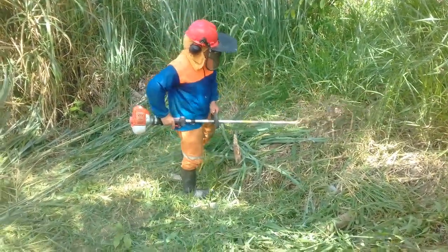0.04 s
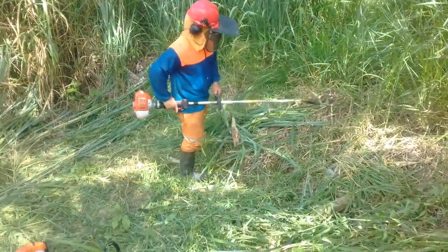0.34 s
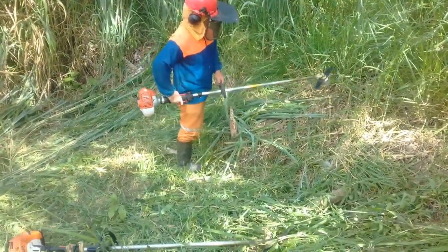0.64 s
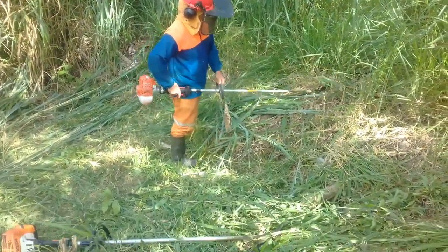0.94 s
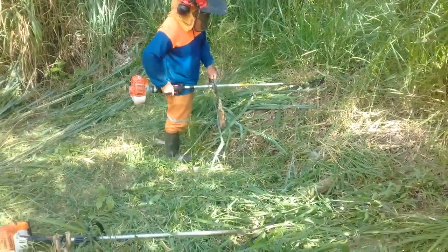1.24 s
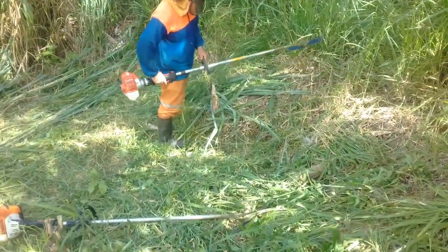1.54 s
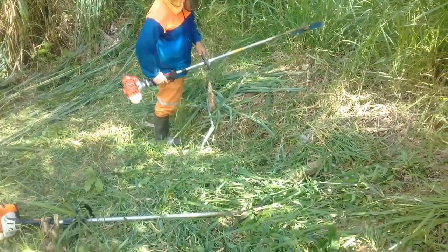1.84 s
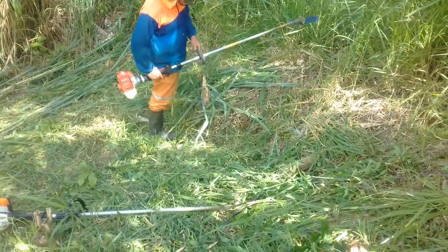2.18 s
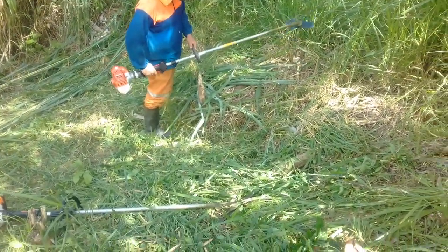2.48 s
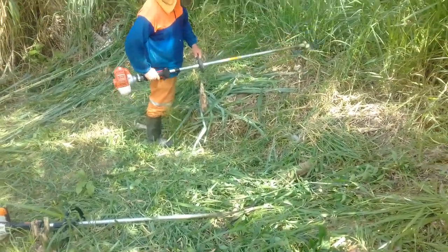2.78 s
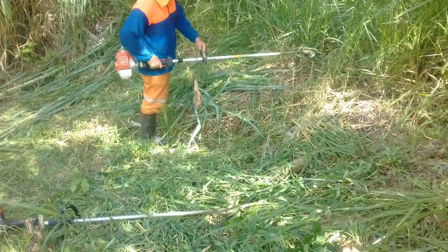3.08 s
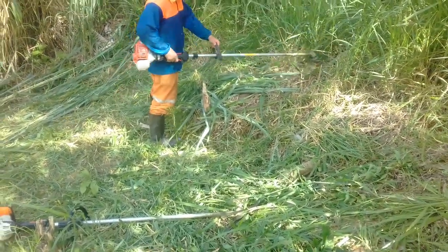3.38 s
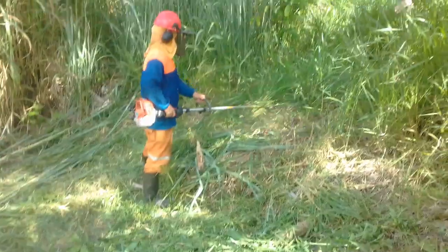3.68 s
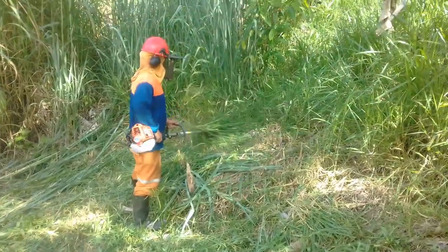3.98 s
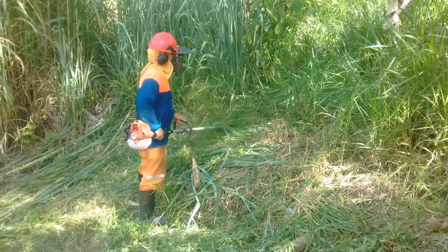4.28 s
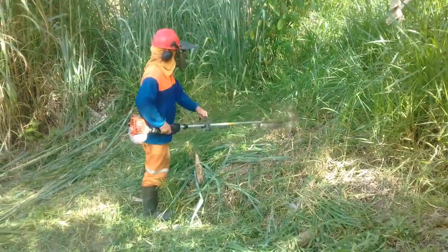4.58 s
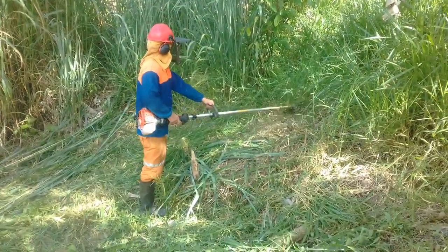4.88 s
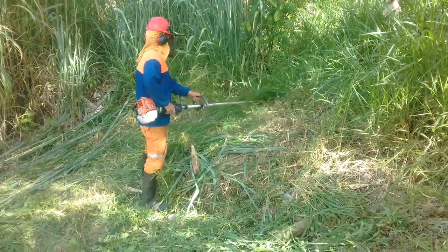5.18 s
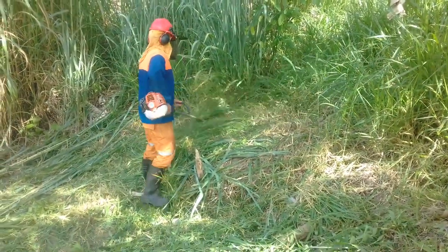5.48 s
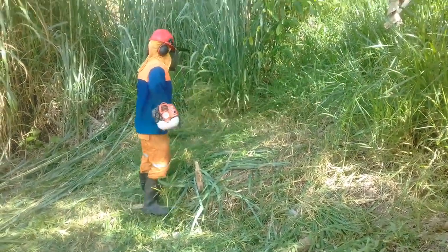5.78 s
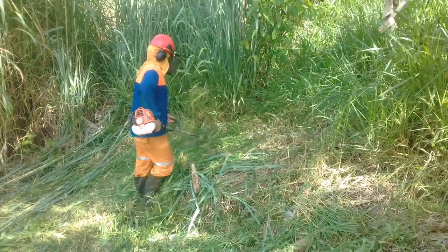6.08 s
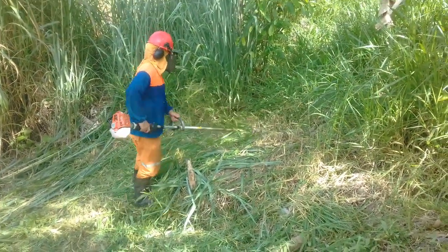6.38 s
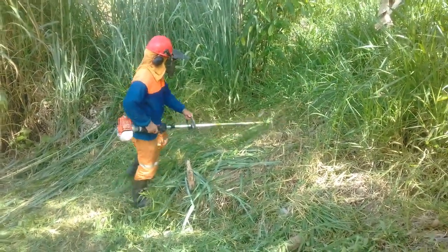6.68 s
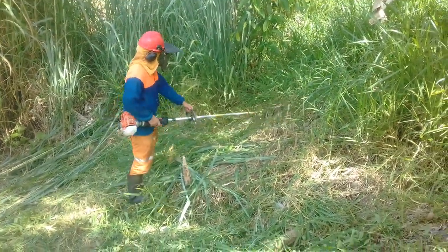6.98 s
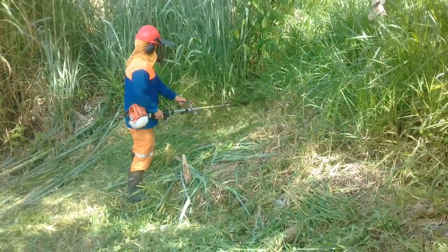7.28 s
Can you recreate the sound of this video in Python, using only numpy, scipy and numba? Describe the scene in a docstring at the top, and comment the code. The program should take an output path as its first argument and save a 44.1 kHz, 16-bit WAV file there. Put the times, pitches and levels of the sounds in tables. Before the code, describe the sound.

A two-stroke brushcutter a few metres away runs down to a lumpy idle with uneven pops and metallic clacks. After about two seconds it revs up with a brief scrape into a rattling buzz. The pitch rises and sags as the blade sweeps through tall grass, each cut making a bright, shredding crackle, with occasional stalk snaps and faint metal rings. It is heard in mono, over a faint outdoor hush.

```python
"""A brushcutter in tall grass

A two-stroke engine a few metres away, heard in mono, runs down to a lumpy, clacking idle, is revved,
then labours through sweep after sweep. One crankshaft times the exhaust pulses and the metal clatter.
Each pull of the trigger lifts and cleans the note, which changes colour as the machine swings.
Each cut shreds stalks into a bright crackle."""
import sys
import numpy as np
from scipy import signal
from scipy.fft import rfft, irfft
from scipy.io import wavfile
from scipy.ndimage import uniform_filter1d, map_coordinates
from numba import njit

SR = 44100
rng = np.random.default_rng(int(sys.argv[2]) if len(sys.argv) > 2 else 0)


def output_pcm(signal):
    """Save a mono or channel-first signal as 16-bit PCM at the path in sys.argv[1].

    Samples are clipped to [-1, 1] before scaling.
    """
    pcm = np.clip(np.atleast_2d(signal).T, -1, 1) * 32767
    wavfile.write(sys.argv[1], SR, np.round(pcm).astype(np.int16))


N = 332514
TIME = np.arange(N) / SR

# Engine speed. Each row: time in seconds, crankshaft turns per second.
IDLE_SPEED = [(0, 60.3), (.3, 52.4), (.62, 46.1), (1.55, 45.95), (1.78, 44.8), (2.0, 44.35), (2.34, 42.2)]
WORK_SPEED = [(2.42, 65.34), (2.48, 80.9), (2.5, 87.9), (2.6, 94.1), (2.69, 95.14), (3.3, 95.16),
              (3.62, 106.9), (3.76, 109.1), (3.96, 119.3), (4.27, 132.6), (4.59, 127.3), (4.81, 110),
              (4.9, 108.5), (5.27, 116.5), (5.53, 116), (5.77, 122.3), (5.89, 128.2), (6.27, 131.4),
              (6.53, 118.7), (6.77, 116.8), (7.08, 119.6), (7.43, 131.1), (7.54, 128.3)]
# Strength of the idle. Each row: time in seconds, relative level in dB.
IDLE_LEVEL = [(0, 5.5), (.55, -1), (.9, -1), (1.15, 2.5), (1.45, 7), (2.34, 6.5)]
# The idle's limp. Each row: start in seconds, turns per firing (a fraction mixes twos and threes).
IDLE_RHYTHM = [(.497, 2.5), (.754, 3), (.884, 2), (.971, 3), (1.361, 2.34), (1.667, 2), (2.208, 3),
               (2.28, 2)]
# The worker's swing. Each row: time in seconds, facing (0 is side on, 1 is engine towards us).
FACING = [(2.4, 0.0075), (3.4, 0.15), (3.85, 0.47), (4.02, 0.58), (4.22, 0.56), (4.32, 0.38), (4.55, 0.42),
          (4.8, 0.13), (5.1, 0.29), (5.35, 0.48), (5.6, 0.861), (6.2, 0.98), (6.7, 0.024), (7.15, 0.036),
          (7.54, 0.49)]
# The bounce off the ground. Each row: time in seconds, delay in milliseconds, share sent back.
GROUND_BOUNCE = [(2.4, .765, .17), (2.82, .8, .14), (2.92, .93, .12), (3.4, .96, .07), (4.8, 1.08, .07),
                 (5.15, 1.3, .08), (5.55, 1.25, .14), (5.85, 1.16, .12), (6.15, 1.18, .15),
                 (6.45, 1.27, .17), (6.7, 1.315, .17), (7.54, 1.33, .12)]
# Pulls of the trigger. Each row: start, end and rise time in seconds, then base levels in dB
# for the engine's five voices: boom, lower pipe, upper pipe, muffler bark and clatter.
TRIGGER_PULLS = [(2.339, 3.344, 0.097, -42.5, -29.5, -29, -29, -19.5),
                 (3.322, 4.242, 0.073, -46.5, -32, -47, -35.5, -30),
                 (4.79, 5.894, 0.09, -42.5, -39, -46, -39, -24),
                 (6.051, 6.168, 0.24, -31.5, -30.5, -41.5, -25, -13),
                 (6.562, 7.411, 0.13, -41, -39.5, -39.5, -42, -25)]
# Those five voices in order. Each row: level with the trigger eased in dB,
# growth with speed in dB per Hz, change when the engine faces us in dB.
VOICE_RESPONSE = [(-51, 0.5, 1), (-49, 0.36, 1), (-52.5, 0.37, 3), (-40, 0.28, -7), (-24.5, 0.3248, -3.5)]
# Runs of thumping misfires. Each row: start and end in seconds, level in dB.
STUMBLES = [(4.6, 4.821, -50), (5.944, 6.079, -44), (6.17, 6.577, -41.5), (7.418, 7.539, -47)]
# Single harmonics (multiples of the engine speed) swell or sink as the machine swings.
# Each row: start and end in seconds, harmonic number, change in dB.
HARMONIC_SWELLS = [(-.1, .5, 4, 6), (2.47, 2.97, 12, 11), (2.55, 2.95, 14, 0), (2.595, 3.272, 18, 4.5),
                   (2.694, 3.278, 19, 17.5), (3.08, 3.4, 17, -12), (3.021, 3.351, 10, -10),
                   (3.038, 3.36, 9, -2.5), (3.787, 4.04, 7, 7.5), (3.501, 3.848, 13, -4),
                   (3.52, 4.24, 10, -3), (3.547, 4.13, 14, 5.5), (3.965, 4.553, 11, 4),
                   (4.07, 4.547, 4, 11.5), (4.347, 4.53, 10, 6), (4.864, 5.243, 6, 5), (4.97, 5.318, 7, -6),
                   (5.03, 5.35, 8, -9), (5.081, 5.453, 10, -5), (5.162, 5.641, 11, 5.5),
                   (5.26, 5.571, 12, -8), (5.563, 5.84, 8, -2), (5.15, 5.42, 3, -12), (5.599, 5.799, 10, 6),
                   (5.66, 5.92, 11, 0.5), (6.122, 6.479, 11, 6), (6.459, 6.726, 14, 6), (6.44, 6.7, 12, -3),
                   (6.371, 6.578, 7, 12), (3.4, 4.55, 1, -5), (6.38, 6.907, 3, -5), (6.492, 7.219, 9, 14.5),
                   (6.561, 6.86, 10, 10), (6.649, 6.936, 5, -6), (6.791, 7.445, 6, 7),
                   (7.027, 7.34, 13, -15), (7.28, 7.467, 12, 1.5), (7.16, 7.45, 8, -5),
                   (7.242, 7.45, 7, -8.5)]
# Bright bands in the clatter for a while as the engine revs. Each row: start and end in seconds, pitch in Hz,
# lift in dB.
BRIGHT_BANDS = [(2.453, 2.902, 8400, 3), (2.522, 3.08, 7100, 4.5), (2.56, 2.92, 11700, 8.5),
                (2.884, 3.142, 9080, 6.5)]
# Bites into the grass. Each row: start, end and rise time in seconds, level in dB, extra dB for stalks.
CUTS = [(-.01, 0.089, 0.0089, -23, 2.5), (0.153, 0.259, 0.054, -28, 5), (0.276, 0.39, 0.024, -32.5, 3),
        (0.93, 0.999, 0.046, -27, 2.5), (1.38, 1.392, 0.017, -31.5, 5), (3.27, 3.442, 0.14, -13, -1),
        (3.464, 3.722, 0.15, -12.5, -1.5), (3.77, 4.04, 0.1, -20, 0), (4.218, 4.387, 0.087, -20.5, -1),
        (4.522, 4.62, 0.011, -16.5, -12), (4.53, 4.799, 0.18, -13, -5), (4.802, 5.42, 0.47, -17, -3.5),
        (6.065, 6.22, 0.016, -22, -0.5), (6.173, 6.86, 0.21, -15, -1.5), (6.943, 7.31, 0.034, -16.5, -9.5),
        (6.982, 7.051, 0.018, -17.5, 1), (7.442, 7.541, 0.0057, -15.5, -2.5)]

# Single knocks. Each row: time in seconds, relative strength in dB.
CLUTCH_KNOCKS = [(0.552, -28), (0.681, -30), (0.8124, -28.5), (1.114, -27.5), (1.165, -33), (1.226, -30),
                 (1.2655, -26), (1.448, -29.5), (1.483, -22), (1.5698, -37), (1.635, -42), (1.666, -36),
                 (1.681, -35), (1.7253, -33), (1.7466, -26), (1.8377, -41), (1.949, -27), (1.9939, -41),
                 (2.0173, -36), (2.023, -35), (2.0388, -36), (2.0616, -25), (2.1078, -22), (2.176, -26),
                 (2.222, -22), (2.271, -40), (2.2784, -33), (2.3178, -22), (2.342, -23), (2.373, -25)]
STALK_SNAPS = [(0.0568, -19), (3.606, -8), (4.4875, 0), (4.521, 0.5), (4.5424, -4), (4.576, -11),
               (5.931, -7), (5.947, -10), (6.073, -22), (6.084, -5), (7.446, 5), (7.4525, 0), (7.465, -11),
               (7.4946, 2)]
BLADE_STRIKES = [(3.399, -31), (3.438, -28.5), (5.441, -36), (6.4, -34), (7.08, -37)]
# The steel blade's notes. Each row: pitch in Hz, relative level in dB, seconds to fade by 60 dB.
BLADE_NOTES = [(2450, -2, 0.41), (2600, -7, 0.6), (2805, -9, 0.4), (5900, -2, 0.3)]
# Ringing of the casing and clutch drum. Each row: pitch in Hz, width in Hz, relative level in dB.
CASING_NOTES = [(2940, 48, 13.5), (3374, 62, 12.5), (3473, 44, 13.5), (4130, 48, 12), (4600, 59, 8),
                (5240, 49, 9.5), (5540, 68, -7), (7020, 31, 5.5), (7970, 290, 5), (8680, 110, 0),
                (11400, 400, -8)]

# Tone colours: how much bass and treble each sound has. Each row: frequency in Hz, relative level in dB.
AIR_TONE = [(25, -36), (65, -51), (150, -9), (400, -9), (1000, -10), (1900, -12.5), (5000, -14), (9000, -7),
            (15000, -24)]
TICK_TONE = [(80, -17), (1200, -8), (1900, -11), (2500, -12), (3400, -11), (5000, -13.5), (6500, -4),
             (8200, -1.5), (10000, -8.5), (12000, -10), (13500, -22), (16000, -43)]
KNOCK_TONE = [(100, -62), (2400, -44), (3400, -6.5), (5000, -12.5), (7200, 9.5), (8100, 6.5), (10000, 1.5),
              (13000, -3), (16000, -25)]
SCRAPE_TONE = [(1060, -41), (1800, -21), (2530, -21), (2820, -11), (4090, -5), (4980, -7), (5650, 1),
               (14200, -14), (15500, -22)]
CLATTER_TONE = [(400, -41), (1500, -8.5), (2600, -12), (5000, -5.5), (6800, 0), (7600, 2.5), (8400, 5.5),
                (9100, 5), (10600, -1.5), (11900, -2.5), (13500, -7), (16000, -12.5)]
GRASS_TONE = [(1120, -30), (1900, -25), (2120, -12), (2330, -19), (2520, -14.5), (3440, -12.5), (3800, -13),
              (5360, -8.5), (6460, -2.5), (8960, 2), (10600, -1.5), (13000, -7.5), (14800, -15.5),
              (15800, -17)]
PUFF_TONE = [(50, -50), (90, -22), (135, -29), (180, 1), (225, 8.5), (350, 3.5), (430, 3.5), (800, -16)]
POP_TONE = [(200, -24), (420, -17), (550, 1.5), (670, 0.5), (850, -0.5), (1050, -24), (1350, -15),
            (1900, -41), (3000, -36)]
MISFIRE_TONE = [(60, -40.5), (100, 4), (125, 14), (190, 2), (290, 18), (400, 14), (500, 18), (850, 6),
                (1200, -3.5)]
RASP_TONE = [(60, -49), (250, -14.5), (600, 18), (1500, 14), (2300, 11), (3500, 14.5), (5000, -10),
             (9000, -22)]
LOWER_PIPE_TONE = [(60, -56), (400, -37), (490, -2.5), (570, 20.5), (760, 17), (820, 17.5), (920, -20.5)]
UPPER_PIPE_TONE = [(100, -71.5), (700, 2.5), (790, 24.5), (855, 34), (950, 19.5), (1040, 23.5), (1130, 12),
                   (1300, -12.5)]
OUTLET_TONE = [(100, -30), (400, -32), (600, 3.5), (750, 8.5), (900, 2), (1020, 12), (1160, -23),
               (1400, -21), (1800, -34), (2400, -45)]
BARK_TONE = [(100, -46), (900, -14), (1130, 24.5), (1240, 38.5), (1430, 31), (1720, 32.5), (1820, 16),
             (1950, 10), (2400, -15)]
BOOM_TONE = [(45, -42), (95, 8.5), (135, 13), (190, -10.5), (245, 8), (380, 11), (480, 7), (650, -4.5)]

# When the engine stops coasting, its idle settles, the clutch starts to grip and the revving begins.
COAST_END_S, SETTLED_S, GRIP_S, REV_S = .5, 1.361, 2.334, 2.36


def amp(db):
    """Turn decibels into a number to multiply by."""
    return 10 ** (np.asarray(db) / 20)


def curve(rows):
    """Join each column of a table with straight lines through time."""
    times, *columns = np.transpose(rows)
    return [np.interp(TIME, times, column) for column in columns]


def envelope(start, end, attack_s, release_s):
    """Rise in a straight line, hold until the end, die away."""
    return np.clip((TIME - start) / attack_s, 0, 1) * np.exp(-np.maximum(TIME - end, 0) / release_s)


def noise():
    """Plain hiss (white noise) of strength 1."""
    return rng.standard_normal(N)


def waver(depth_db=.95, count=50):
    """A volume that wanders a little, through `count` random points."""
    return amp(depth_db * np.interp(TIME, np.linspace(0, TIME[-1], count), rng.standard_normal(count)))


def scatter(times, spread_db):
    """A random size for each stroke, never far beyond the usual spread."""
    return amp(spread_db * np.clip(rng.standard_normal(len(times)), -2, 2))


def steady(x, size=4000):
    """Hold the average strength over `size` samples at 1, keeping faster flutter."""
    power = uniform_filter1d(uniform_filter1d(x ** 2, size), size // 2)
    return x / np.sqrt(np.abs(power) + 1e-12)


def tone_gains(tone, size):
    """Spread a tone table over evenly spaced frequencies."""
    hz, db = np.transpose(tone)
    grid = np.maximum(np.arange(size // 2 + 1) * SR / size, 1)
    return amp(np.interp(np.log(grid), np.log(hz), db))


def colour(x, tone, size=4096):
    """Give a sound a tone colour that rings only after each click; plain hiss keeps its strength."""
    cepstrum = irfft(np.log(tone_gains(tone, size)))
    response = irfft(np.exp(rfft(2 * cepstrum[:size // 2], size)))
    return signal.fftconvolve(x, response / np.linalg.norm(response))[:N]


def burst(x, tone, size=1024):
    """Turn each click into a short puff that rises and falls alike."""
    shape = np.roll(irfft(tone_gains(tone, size)), size // 2)
    return signal.fftconvolve(x, shape, "same")


def clicks(times, sizes, count=6):
    """Clean clicks at exact times, even between samples."""
    at = times[:, None] * SR
    index = np.floor(at).astype(int) + np.arange(1 - count, count + 1)
    taps = np.sinc(index - at) * np.sinc((index - at) / count) * np.reshape(sizes, (-1, 1))
    return np.bincount(np.clip(index, 0, N - 1).ravel(), taps.ravel(), N)


def ring_out(x, decay_s):
    """Give every click a fading tail."""
    return signal.lfilter([1], [1, -np.exp(-1 / (decay_s * SR))], x)


def resonate(x, hz, width_hz):
    """Ring at one pitch; the narrower the width, the longer the ring."""
    return signal.lfilter(*signal.iirpeak(hz, hz / width_hz, SR), x)


@njit
def resonate_moving(x, hz, width_hz):
    """Ring at a pitch that may glide (a state-variable band-pass filter)."""
    y, band, low = np.empty(len(x)), 0., 0.
    for i in range(len(x)):
        tuning, damping = np.tan(np.pi * hz[i] / SR), width_hz / hz[i]
        ring = (band + tuning * (x[i] + 1e-18 - low)) / (1 + tuning * (tuning + damping))
        band, low = 2 * ring - band, low + 2 * tuning * ring
        y[i] = damping * ring
    return y


def swell(x, hz, width_hz, start, end, db, fade_s=.13):
    """What to add to a sound to turn one narrow band up or down for a while."""
    fade = np.clip(np.minimum(TIME - start, end - TIME) / fade_s + .5, 0, 1)
    return (amp(db * fade) - 1) * resonate_moving(x, hz * np.ones(N), float(width_hz))


def strokes(turns, offset=0):
    """The times at which a shaft passes one point of its turn."""
    return np.interp(np.arange(int(turns[-1])) + offset % 1, turns, TIME)


def revved(rise_s=.44):
    """0 at idle, 1 once the engine has picked up."""
    return np.clip((TIME - REV_S) / rise_s, 0, 1)


def engaged(rise_s=.17):
    """0 while the clutch is free, 1 once it drives the blade."""
    return np.clip((TIME - GRIP_S) / rise_s, 0, 1)


def idling():
    """Volume of the idle sounds, which give way as the engine picks up."""
    return amp(curve(IDLE_LEVEL)[0]) * (1 - revved())


def throttle(hz, facing, span_hz=11):
    """Trigger position and each voice's volume: a pull lifts them, and they swell with speed."""
    eased_db, swell_db, facing_db = np.transpose(VOICE_RESPONSE)[..., None]
    trigger, power = 0, (revved() * amp(eased_db)) ** 2
    for start, end, attack, *db in TRIGGER_PULLS:
        held = envelope(start, end, attack, release_s=.028)
        gained_hz = np.clip(hz - np.average(hz, weights=held), -span_hz, span_hz)
        power = power + (held * amp(np.array(db)[:, None] + swell_db * gained_hz)) ** 2
        trigger = trigger + held
    return np.minimum(trigger, 1), np.sqrt(power) * amp(facing_db * facing)


def outdoor_air():
    """The faint, even hush of the open air."""
    return amp(-45.5) * colour(noise(), AIR_TONE)


def over_ground(x, mat_ms=.065):
    """Cut grass bounces treble off its top and, flipped, from beneath; the delay follows the swing."""
    lag_ms, bounce = curve(GROUND_BOUNCE)
    top, beneath = (map_coordinates(x, [(TIME - ms / 1000) * SR], order=3)
                    for ms in (lag_ms - mat_ms, lag_ms))
    return (x + bounce * (top - beneath)) / np.hypot(1, 2 * bounce)


def casing(x, tone, ring_db):
    """Knocks set the engine's metal shell ringing."""
    rings = sum(amp(db) * resonate(x + 1e-18, hz, width) for hz, width, db in CASING_NOTES)
    return colour(x + amp(ring_db) * rings, tone)


def piston_ticks(turns):
    """At idle each piston slap is a separate, softly ringing tick, slightly uneven in time."""
    slaps = strokes(turns, offset=.6)
    knocks = clicks(slaps + .003 * rng.random(len(slaps)), scatter(slaps, spread_db=2.5))
    rattle = (.035 + .2 * ring_out(knocks, decay_s=.004)) * noise()
    return amp(-44) * idling() * steady(casing(rattle, TICK_TONE, ring_db=-2.5), size=8000)


def clutch_knocks():
    """At idle the loose clutch shoes knock on their drum and briefly chatter."""
    times, db = np.transpose(CLUTCH_KNOCKS)
    knocks = clicks(times, amp(db))
    chatter = (ring_out(knocks, decay_s=.002) + .2 * ring_out(knocks, decay_s=.01)) * noise()
    return amp(-3.5) * casing(chatter + knocks, KNOCK_TONE, ring_db=4)


def clutch_scrape(start_s=2.43, length_s=.03):
    """The shoes fly out and rasp against the drum just before they fully grip."""
    press = envelope(start_s, start_s + length_s, attack_s=.017, release_s=.011)
    return amp(-21.5) * press * colour(noise(), SCRAPE_TONE)


def blade_ring():
    """The steel blade rings on after meeting something hard."""
    times, db = np.transpose(BLADE_STRIKES)
    age = TIME[:SR]
    ring = sum(amp(level) * np.sin(2 * np.pi * hz * age) * amp(-60 * age / fade_s)
               for hz, level, fade_s in BLADE_NOTES)
    return signal.fftconvolve(clicks(times, amp(db)), ring)[:N]


def clatter(turns, gain, facing, band_width_hz=290):
    """At speed the piston slaps, weaker on the way back, merge into a buzz with the hiss of gears."""
    slaps, returns = strokes(turns, offset=.3), strokes(turns, offset=.92)
    knocks = clicks(slaps, scatter(slaps, spread_db=3.5))
    knocks += .019 * clicks(returns, scatter(returns, spread_db=1))
    # the shell's countless small rings smear every slap in the same way
    age = TIME[:700]
    shell = rng.standard_normal(len(age)) * np.exp(-age / .004)
    buzz = signal.fftconvolve(knocks, shell)[:N]
    rattle = .55 * buzz + (.8 + ring_out(knocks, decay_s=.003)) * noise()
    # a narrow whine leaves the back of the engine
    whine = resonate(resonate(rattle, hz=2900, width_hz=210), hz=3100, width_hz=220)
    metal = casing(rattle, CLATTER_TONE, ring_db=-11.5)
    metal += sum(swell(metal, hz, band_width_hz, start, end, db) for start, end, hz, db in BRIGHT_BANDS)
    return gain * engaged() * steady(metal) + amp(-44) * facing * steady(whine)


def stalk_snaps():
    """A thick stalk breaks with a crack and a brief splintering."""
    times, db = np.transpose(STALK_SNAPS)
    breaks = clicks(times, amp(db))
    splinters = (ring_out(breaks, decay_s=.00075) + .36 * ring_out(breaks, decay_s=.017)) * noise()
    return amp(-9.5) * colour(splinters, GRASS_TONE)


def blade_contact(stubble_db=-28):
    """How hard the blade cuts leaves and stalks: each bite adds to a light brushing of stubble."""
    leaf_power = stalk_power = (amp(stubble_db) * engaged()) ** 2
    for start, end, attack, db, stalk_db in CUTS:
        # leaves keep flying for longer after a long cut
        bite = amp(db) * envelope(start, end, attack, release_s=.029 + .35 * (end - start))
        leaf_power = leaf_power + bite ** 2
        stalk_power = stalk_power + (amp(stalk_db) * bite) ** 2
    return np.sqrt(leaf_power), np.sqrt(stalk_power)


def grass_shredding(turns, gear_ratio=.74, crack_spread_db=8, cracks_per_s=2600, split_hz=6060):
    """Two blade tips tear through stalks: clumps of tiny cracks over the swish of flying leaves."""
    passes = strokes(2 * gear_ratio * turns)
    hits = passes + .006 * rng.random(len(passes))  # a tip meets its stalk anywhere along its arc
    bite = 11.5 + ring_out(clicks(hits, scatter(hits, spread_db=12)), decay_s=.027)
    cracking = rng.random(N) < cracks_per_s / SR
    sizes = amp(crack_spread_db * np.minimum(rng.exponential(size=N), 4))
    cracks = cracking * sizes * np.sign(noise())
    tearing = bite * (cracks / np.std(cracks) + 2.46 * noise())
    shred = steady(colour(tearing, [(200, -89)] + list(GRASS_TONE)))
    # stalks tear below the split, leaves shred above it
    stalks = signal.sosfiltfilt(signal.butter(2, split_hz, fs=SR, output="sos"), shred)
    leaves = shred - stalks
    leaf_gain, stalk_gain = blade_contact()
    # tufts come unevenly, so leaves and stalks each swish on their own
    tufts, clumps = waver(depth_db=1, count=170), waver(depth_db=1.2, count=130)
    return tufts * leaf_gain * leaves + clumps * stalk_gain * stalks


def firings(times):
    """Which turns of the idling crankshaft fire: every second or third one."""
    starts, gaps = np.transpose(IDLE_RHYTHM)
    first_turn = np.abs(times[:, None] - starts).argmin(axis=0)
    turn = np.arange(len(times))
    row = np.maximum(np.searchsorted(first_turn, turn, side="right") - 1, 0)
    since = turn - first_turn[row]
    return np.ceil(since / gaps[row]) < (since + 1) / gaps[row]


def idle_exhaust(turns, puff_db=-58.5, coast_db=-47, pop_db=-52.5):
    """Starved of fuel, the engine pops hard only on some turns; those between mostly puff."""
    times = strokes(turns)
    recovery = np.interp(times, [COAST_END_S, SETTLED_S], [.45, 1]) * (times > COAST_END_S - .03)
    fired = firings(times) * recovery
    puffs = clicks(times, (1 - .25 * fired) * scatter(times, spread_db=.7))
    pops = clicks(times + .001, (.36 + fired) * scatter(times, spread_db=.8))
    pipe_ring = 1.3 * resonate(pops, hz=680, width_hz=40)
    hiss = .016 * ring_out(pops, decay_s=.014) * noise()
    popping = steady(burst(pops + pipe_ring + hiss, POP_TONE), size=6000)
    coasting = envelope(-.8, COAST_END_S, attack_s=.91, release_s=.06)
    puff_gain = np.hypot(amp(puff_db) * idling(), amp(coast_db) * coasting)
    return puff_gain * steady(colour(puffs, PUFF_TONE)) + amp(pop_db) * idling() * popping


def misfires(times, weak_drop=.55, slip_chance=.1):
    """With too much fuel the engine growls: only every other turn is strong, and the beat may slip."""
    weak = np.cumsum(1 + (rng.random(len(times)) < slip_chance)) % 2
    pulses = clicks(times, (1 - weak_drop * weak) * scatter(times, spread_db=1.2))
    gusts = .05 * ring_out(pulses, decay_s=.012) * noise()
    gain = sum(amp(db) * envelope(start, end, attack_s=.056, release_s=.053)
               for start, end, db in STUMBLES)
    return gain * steady(colour(pulses + gusts, MISFIRE_TONE))


def jet_rasp(pulses, bark_gain):
    """The jet of gas at the outlet rasps once a turn, louder when the muffler barks."""
    jet = pulses + .06 * ring_out(pulses, decay_s=.004) * noise()
    gain = np.hypot(amp(-42) * revved(), amp(-12) * bark_gain)
    return gain * steady(colour(jet, RASP_TONE))


def muffler_bark(gas, facing, cold_drop=.13, warm_s=1.17, can_hz=1431, can_width_hz=22):
    """The muffler rings, lower until its gas warms; its can sings when a harmonic crosses its note."""
    warmth = 1 - cold_drop * np.exp(-np.maximum(TIME - REV_S, 0) / warm_s)
    ring = resonate_moving(gas, hz=warmth * (1610 - 330 * facing), width_hz=71.)
    bark = colour(ring + .27 * gas, BARK_TONE)
    can = resonate(resonate(gas, can_hz, can_width_hz), can_hz, 3 * can_width_hz)
    return waver() * (steady(bark) + amp(-12) * can / np.std(can))


def exhaust_pipe(pulses, gas, trigger, facing, lower_gain, upper_gain):
    """Two pipe tones shift with the swing, giving way to the bare pulse as the outlet points at us."""
    lower = resonate_moving(gas, hz=745 + 24.99 * facing, width_hz=172.)
    upper = resonate_moving(gas, hz=780 + 326 * np.sqrt(np.abs(facing)), width_hz=150.)
    # about halfway round, the lower tone nearly cancels and the upper one stands out
    halfway = trigger * np.exp(-((facing - .49) / .086) ** 2)
    tones = amp(-20 * halfway) * lower_gain * steady(colour(lower, LOWER_PIPE_TONE))
    tones += amp(6.5 * halfway) * upper_gain * waver() * steady(colour(upper, UPPER_PIPE_TONE))
    outlet = amp(1.5) * np.hypot(lower_gain, upper_gain) * steady(burst(.5 * (pulses + gas), OUTLET_TONE))
    aimed = np.clip((facing - .639) / .25, 0, 1)
    return np.sqrt(1 - aimed) * tones + np.sqrt(aimed) * outlet


def working_exhaust(turns, hz, trigger, facing, gains, rough_eased=.29, rough_pulled=.04):
    """A pulse each turn rings pipe and muffler; rough burning makes it uneven and adds a gust of gas."""
    boom_gain, lower_gain, upper_gain, bark_gain = gains
    times = strokes(turns)
    roughness = np.interp(times, TIME, rough_eased + (rough_pulled - rough_eased) * trigger)
    uneven_times = times + .00012 * roughness * rng.standard_normal(len(times))
    pulses = clicks(uneven_times, scatter(times, spread_db=2 * roughness))
    gas = pulses + .11 * ring_out(clicks(times, roughness), decay_s=.02) * noise()
    note = boom_gain * steady(colour(pulses, BOOM_TONE))
    note += exhaust_pipe(pulses, gas, trigger, facing, lower_gain, upper_gain)
    note += misfires(times)
    note += bark_gain * muffler_bark(gas, facing)
    note += jet_rasp(pulses, bark_gain)
    return note + sum(swell(note, round(harmonic) * hz, 21, start, end, db)  # bands 21 Hz wide
                      for start, end, harmonic, db in HARMONIC_SWELLS)


def scene():
    """The crankshaft sets the pace of exhaust, clatter and cutting; faint outdoor air lies beneath."""
    hz, = curve(list(IDLE_SPEED) + list(WORK_SPEED))
    facing, = curve(FACING)
    turns = np.cumsum(hz) / SR
    turns -= np.interp(SETTLED_S, TIME, turns) % 1  # a firing marks the start of a turn
    trigger, (*exhaust_gains, clatter_gain) = throttle(hz, facing)
    exhaust = working_exhaust(turns, hz, trigger, facing, exhaust_gains) + idle_exhaust(turns)
    metal = piston_ticks(turns) + clutch_knocks() + clutch_scrape() + blade_ring()
    cutting = over_ground(clatter(turns, clatter_gain, facing) + grass_shredding(turns)) + stalk_snaps()
    mono = outdoor_air() + metal + cutting + exhaust
    return np.array([mono, mono])


def record(dry, ceiling=.9, top_hz=15900):
    """Round off the very highest peaks and cut the top of the treble."""
    rounded = dry / (1 + (dry / ceiling) ** 6) ** (1 / 6)
    return signal.sosfilt(signal.ellip(10, .2, 70, top_hz, fs=SR, output="sos"), rounded)


dry = scene()
out = record(dry)
output_pcm(out)
```